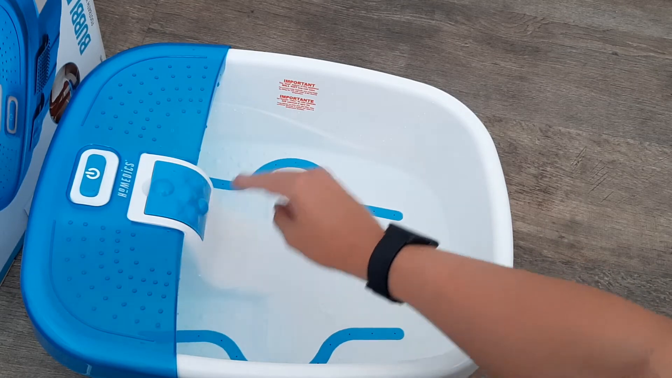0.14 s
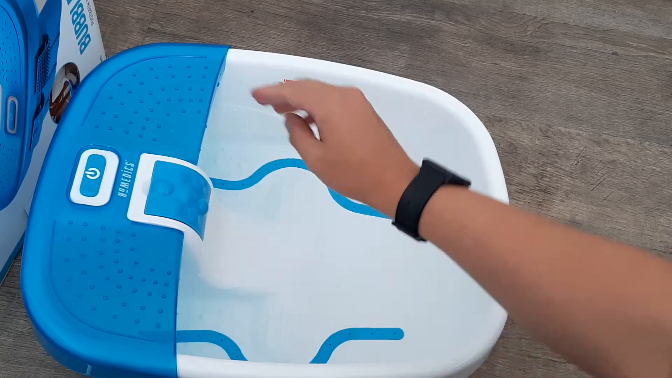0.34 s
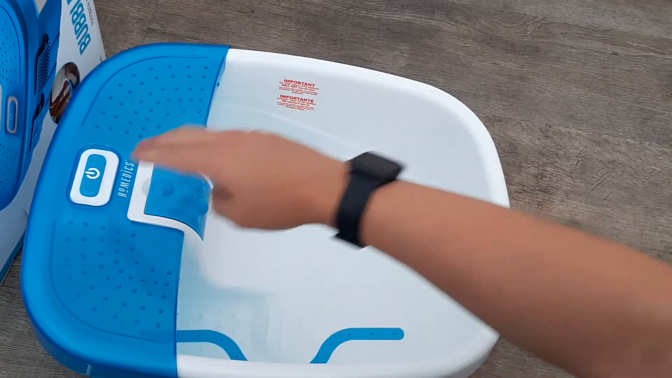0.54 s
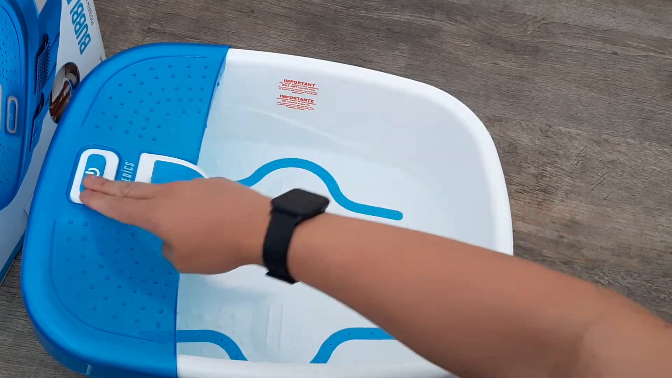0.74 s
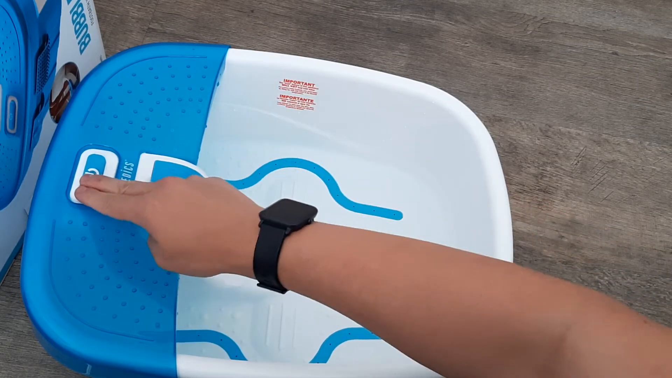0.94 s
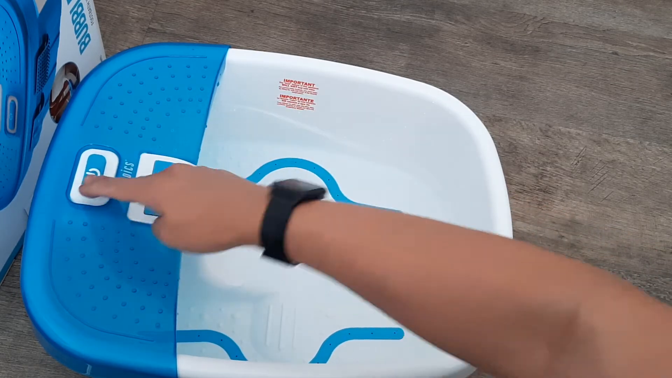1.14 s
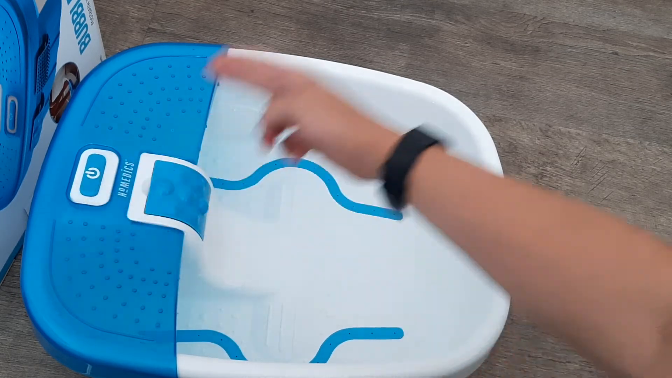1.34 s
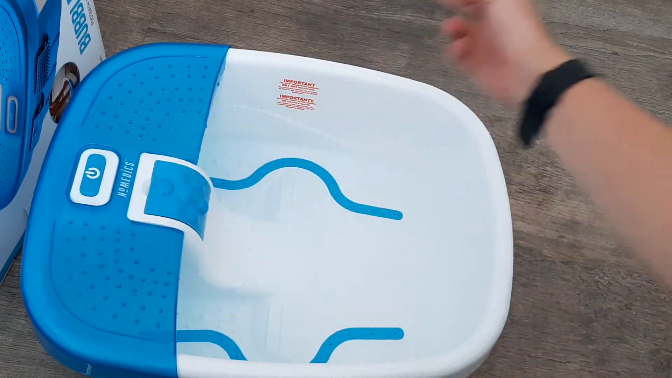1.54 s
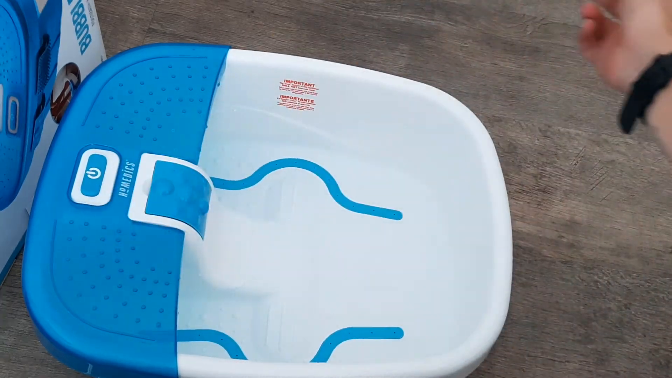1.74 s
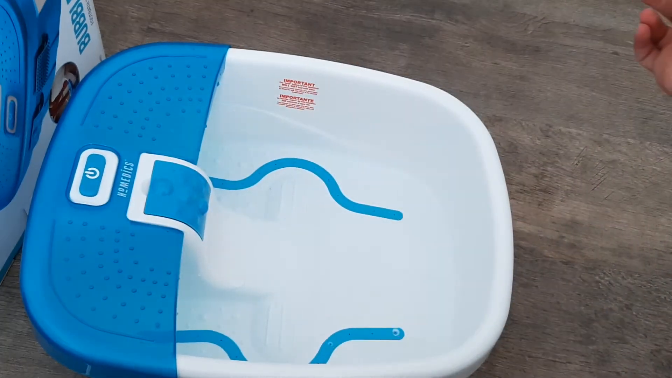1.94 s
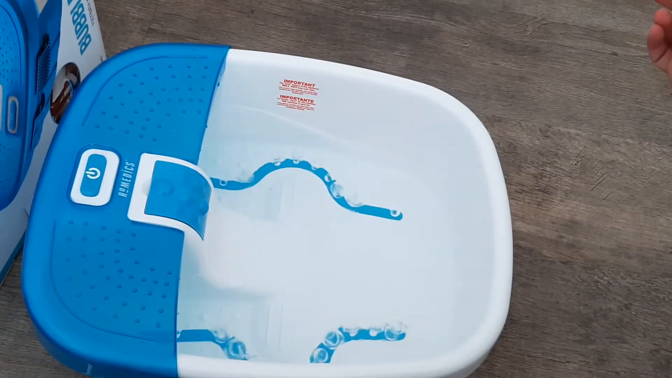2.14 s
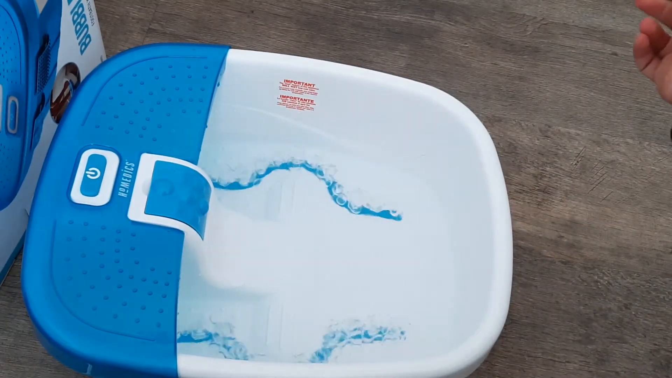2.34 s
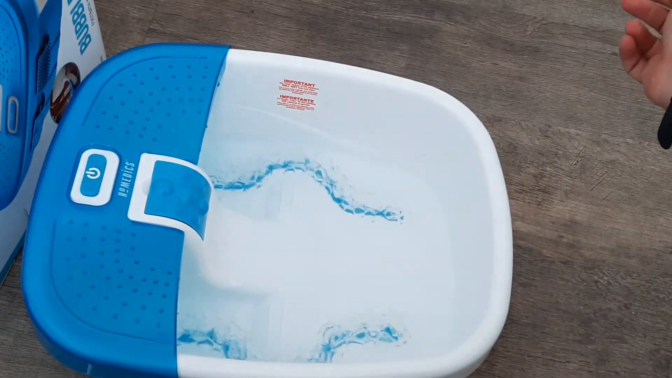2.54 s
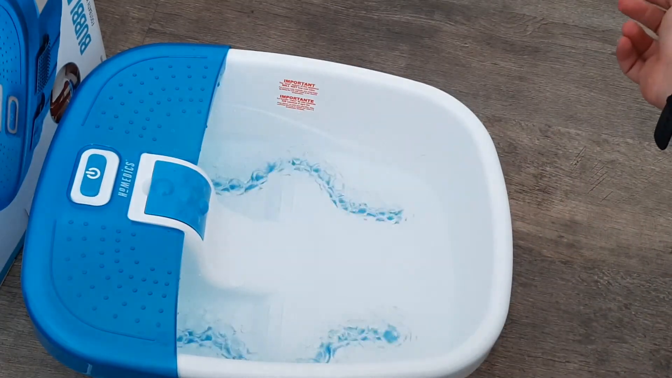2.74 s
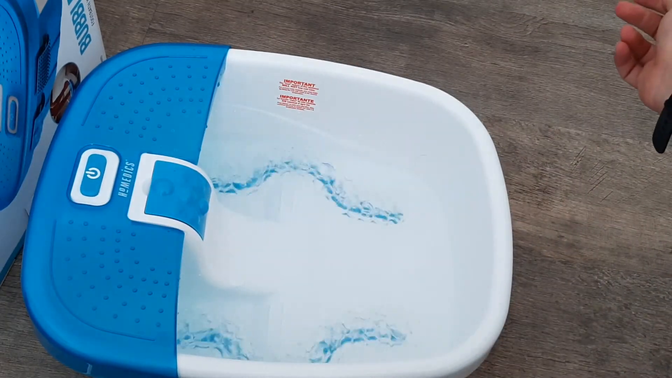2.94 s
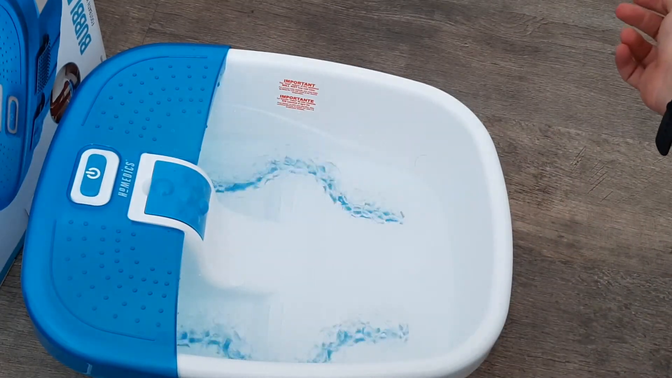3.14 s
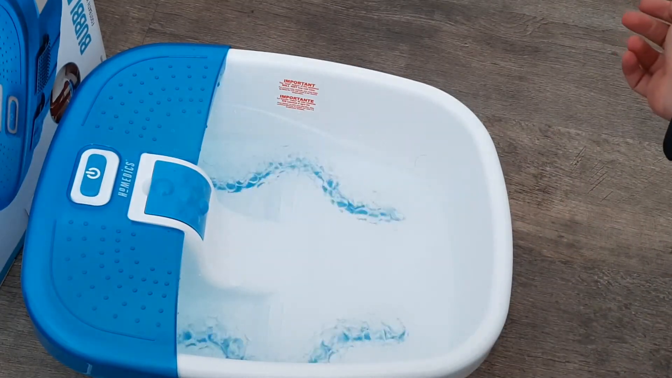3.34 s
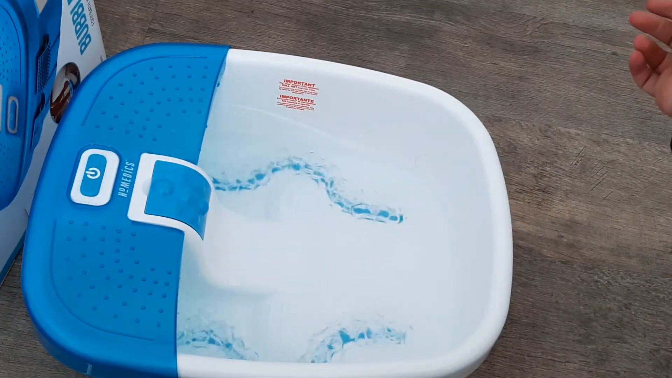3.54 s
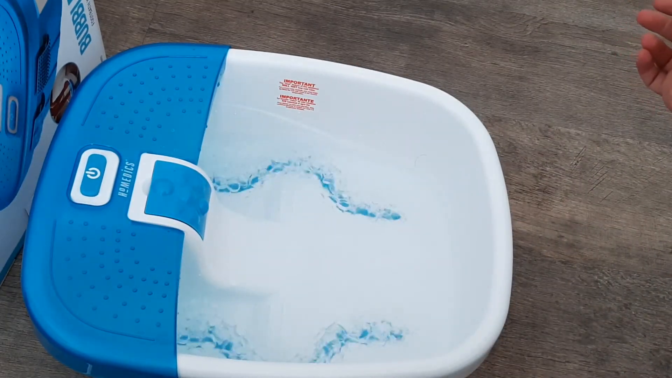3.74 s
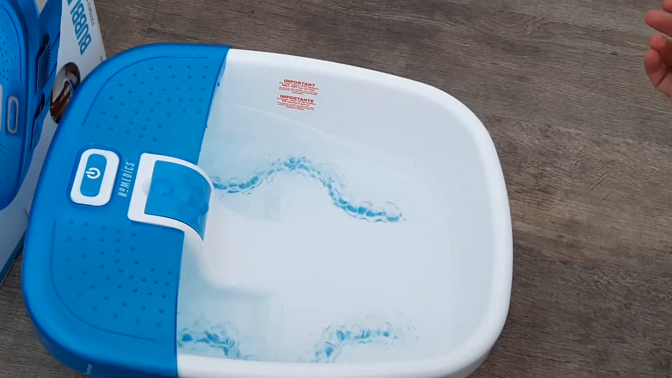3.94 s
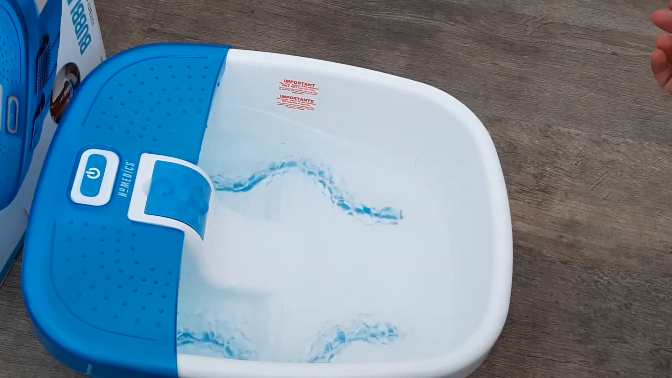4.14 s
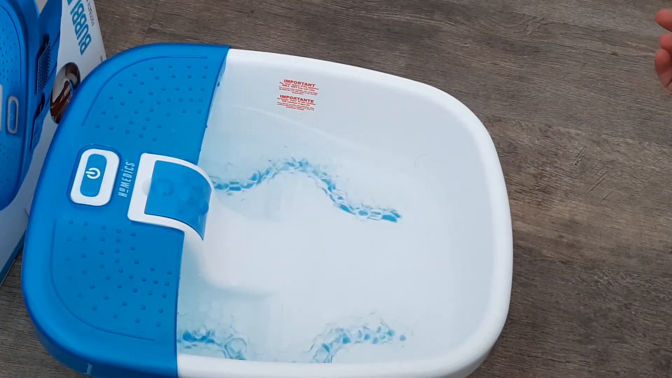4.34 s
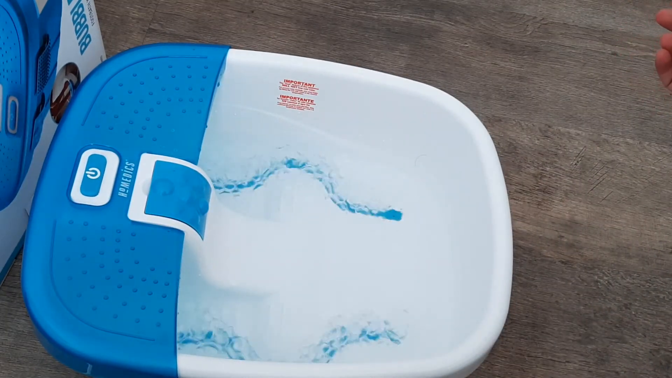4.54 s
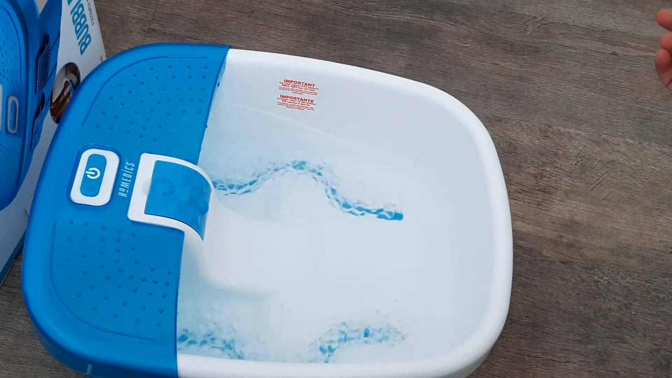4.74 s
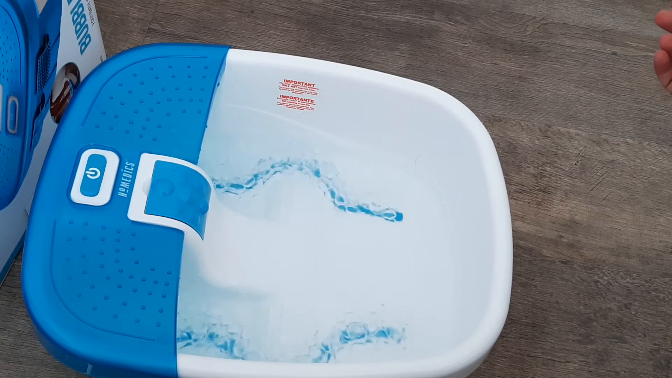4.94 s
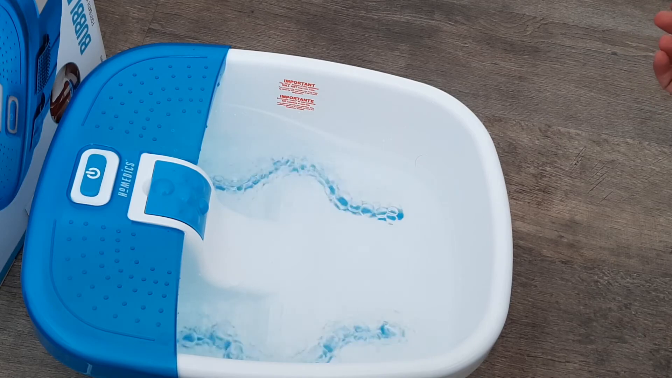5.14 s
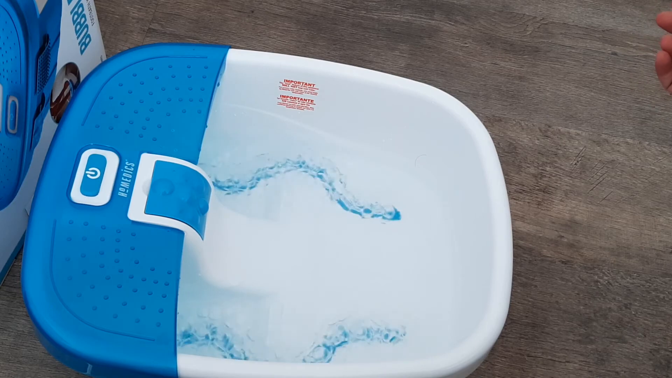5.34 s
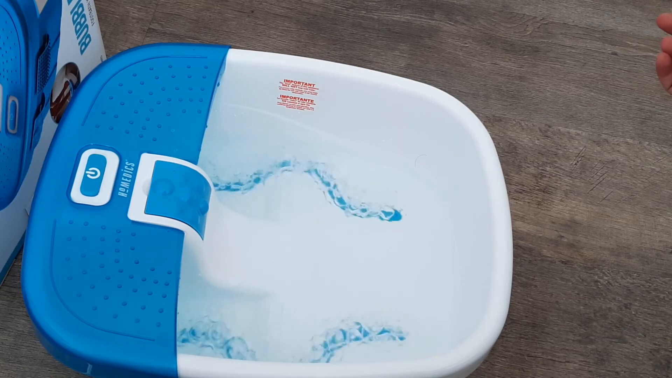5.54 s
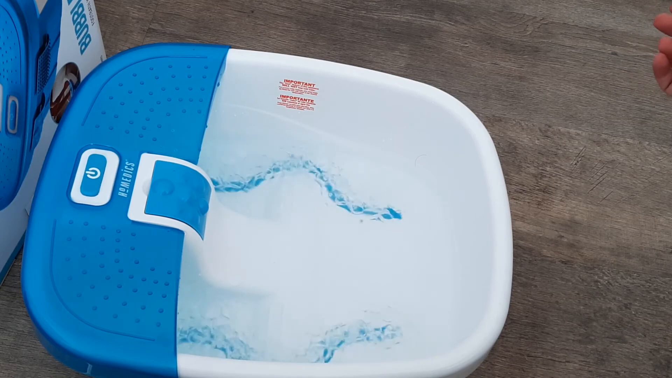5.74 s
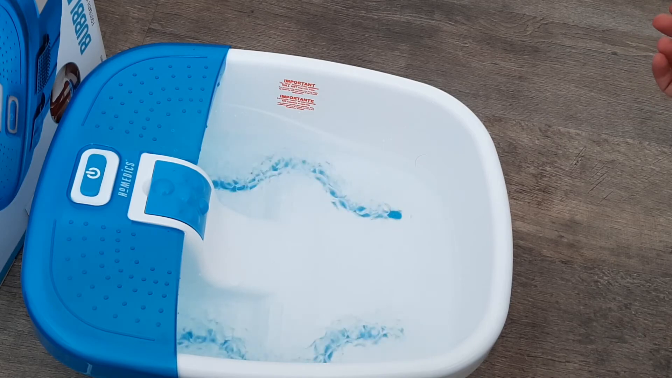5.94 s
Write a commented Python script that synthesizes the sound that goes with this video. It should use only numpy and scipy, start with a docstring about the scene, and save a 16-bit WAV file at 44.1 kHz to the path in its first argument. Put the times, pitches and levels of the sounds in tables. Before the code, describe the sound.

Quiet room tone, then a faint tap and several dry plastic switch clicks around one second. A small blower motor starts at once, growling low and sweeping quickly up to a humming whine. Air rushes louder and bubbles begin to gurgle about two seconds in, thumping hollowly in a plastic tub with bright little spits on top. It continues steadily to the end. Close stereo microphones, small hard-floored room, tub slightly to the right.

```python
"""A finger taps and presses a switch: dry clicks of a control panel, mostly heard through a small room.
A foot spa on the hard floor then spins up its blower motor: hum, growl and whine follow one shaft speed,
with a rush of filtered noise for the blown air, a thin treble hiss and floor rumble.
Air bubbles through the water as short rising rings that thump the plastic tub; bright spits burst on top.
Table levels are settings ahead of the layer trims, the left-right tilt and the overall tone colour."""
import sys
import numpy as np
from scipy import signal
from scipy.fft import rfft, irfft, next_fast_len
from scipy.io import wavfile
from scipy.ndimage import uniform_filter1d, map_coordinates

SR = 44100
rng = np.random.default_rng(int(sys.argv[2]) if len(sys.argv) > 2 else 0)


def waveform_to_disk(signal):
    """Save audio, clipped to [-1, 1], as 16-bit WAV at the path in sys.argv[1]."""
    frames = np.transpose(np.atleast_2d(signal))
    scaled = np.clip(frames, -1, 1) * 32767
    samples = np.round(scaled).astype(np.int16)
    wavfile.write(sys.argv[1], SR, samples)


N = 268569


def amp(db):
    """dB to gain."""
    return 10 ** (np.asarray(db) / 20)


def unit(x):
    """Scaled to rms 1."""
    return x / np.sqrt(np.mean(x ** 2) + 1e-20)


def along(points, hz):
    """Value at hz from (f/Hz, value) points on a log frequency axis."""
    f, v = np.transpose(points)
    return np.interp(np.log(hz + 1), np.log(f + 1), v)


def curves(rows):
    """One value per sample for each column after the time."""
    s, *cols = np.transpose(rows)
    return [np.interp(np.arange(N) / SR, s, c) for c in cols]


def fade_in(s, length):
    """Gain that rises from 0 and reaches 1 at time s, length in seconds."""
    return np.clip(1 + (np.arange(N) / SR - s) / length, 0, 1) ** 2


def wobble(rate):
    """A smooth random curve, rate knots a second."""
    knots = rng.standard_normal(int(N * rate / SR) + 4)
    return map_coordinates(knots, [np.arange(N) * rate / SR])


def noise_pair():
    """Two unrelated white noises."""
    return rng.standard_normal((2, N))


def filtered(x, response):
    """x passed through a response given as a function of frequency."""
    m = next_fast_len(N + SR // 2)
    return irfft(rfft(x, m) * response(np.fft.rfftfreq(m, 1 / SR)), m)[..., :N]


def resonances(modes):
    """Bank of ringing modes (f/Hz, width/Hz, level/dB), each a causal band-pass."""
    def response(f):
        total = 0
        for k, (centre, width, db) in enumerate(modes):
            mode = 1j * f * width / (centre * centre - f * f + 1j * f * width)
            total = total + (-1) ** k * amp(db) * mode  # neighbours alternate in sign
        return total
    return response


# stereo image of diffuse sound: (f/Hz, left-right likeness, 1 = identical, negative = opposed)
LIKENESS = [(60, 0.82), (180, 1), (550, 0.68), (1650, -0.38), (4970, -0.06), (15000, -0.15)]


def mid_side_gains(hz):
    """Share of the common and the opposed signal that gives the likeness at each frequency."""
    turn = np.arccos(np.clip(along(LIKENESS, hz), -1, 1)) / 2
    return np.array([np.cos(turn), np.sin(turn)])


def pair(a, b, spectrum):
    """Two unrelated signals coloured by (f/Hz, level/dB) points and mixed to a stereo rms of 1."""
    mid, side = filtered(np.array([a, b]), lambda hz: amp(along(spectrum, hz)) * mid_side_gains(hz))
    return unit(np.array([mid + side, mid - side]))


def arrive(x):
    """Direct sound reaches the right microphone 8 samples before the left."""
    return np.array([np.pad(x, (8, 0))[:N], x])


# decay of the small room: (f/Hz, t60/s)
ROOM_DECAY = [(150, 0.51), (500, 0.24), (1000, 0.25), (4000, 0.31), (12000, 0.27)]
TAIL_S = .3  # the echo crossfades to a new random tail at this interval


def room_tails(count, long):
    """Random stereo tails that build up in a few ms, then die at each frequency's own speed."""
    hz, t, z = signal.stft(rng.standard_normal((count, 2, long)), SR, nperseg=256)
    envelope = (1 - np.exp(-t / 0.0048)) * amp(-60 * t / along(ROOM_DECAY, hz)[:, None])
    tail = signal.istft(z * envelope, SR, nperseg=256)[1][..., :long]
    gains = mid_side_gains(np.fft.rfftfreq(long, 1 / SR))
    mid, side = np.moveaxis(irfft(rfft(tail) * gains, long), 1, 0)
    tail = np.stack([mid + side, mid - side], 1)
    return tail / np.sqrt(np.mean(np.sum(tail ** 2, -1)))


def room(x):
    """Diffuse echo: each stretch gets its own random tail, crossfaded, so no single tail colours all."""
    hop, long = round(TAIL_S * SR), SR // 2
    count = N // hop + 2
    tail = room_tails(count, long)
    padded = np.pad(x, (hop, 2 * hop))
    out = np.zeros((2, N + 4 * hop + long))
    window = signal.get_window("hann", 2 * hop)
    for k in range(count):
        stretch = padded[k * hop:(k + 2) * hop] * window[:len(padded) - k * hop]
        wet = signal.fftconvolve(stretch[None], tail[k], axes=1)
        out[:, k * hop:][:, :wet.shape[1]] += wet
    return out[:, hop:hop + N]


STEP = 100  # samples between the points of a tone's level curve


def tone(turn, db, spread, flutter_db, rate):
    """A sine of phase turn (db per STEP); each microphone hears its own phase and flutter."""
    knots = rng.standard_normal((2, int(rate * N / SR)))
    step, at = np.arange(0, N, STEP), np.linspace(0, N, knots.shape[1])
    flutter = np.array([np.interp(step, at, k) for k in knots])
    gain = amp(db + flutter_db * flutter)
    gain = np.array([np.interp(np.arange(N), step, g) for g in gain])
    phase = turn % (2 * np.pi) + rng.uniform(-spread, spread, (2, 1))
    return np.sqrt(2) * gain * np.sin(phase.astype(np.float32))


# spectrum of room tone and preamp hiss: (f/Hz, level/dB per Hz)
QUIET_SPECTRUM = [(25, -40), (45, -20), (65, -2), (95, -13), (125, -1), (170, -12), (240, -7), (320, -18.5),
                  (800, -25), (1150, -26), (1450, -22), (1800, -30), (2500, -31), (7000, -43.5),
                  (11000, -45.5), (13000, -34), (15500, -32)]


def room_tone():
    """Steady room tone and preamp hiss: coloured noise that sways a little, stronger on the right."""
    sway_db = 1.5 * wobble(5)
    return amp(-68 + sway_db + [[-1.2], [1.2]]) * pair(*noise_pair(), QUIET_SPECTRUM)


# floor rumble under the tub: (t/s, level/dB)
RUMBLE_LEVEL = [(1.2, -73), (2.0, -58.5), (2.8, -62.5), (6.09, -58)]


def rumble():
    """The floor shakes in the lowest octaves while the motor runs: low-passed noise."""
    level_db, = curves(RUMBLE_LEVEL)
    low = pair(*noise_pair(), [(20, -32), (35, -4), (60, 1), (100, -4), (130, -15), (200, -60)])
    return fade_in(1.4, .2) * amp(level_db + 4.5) * low


# thin treble hiss that swells during the run-up: (t/s, level/dB)
TREBLE_LEVEL = [(1.4, -88), (1.6, -77), (1.75, -66), (2.0, -61), (2.4, -63), (3.0, -72), (6.09, -76)]


def hiss():
    """A thin treble hiss swells during the run-up, is strongest near 2 s, then sinks: band-passed noise."""
    level_db, = curves(TREBLE_LEVEL)
    treble = pair(*noise_pair(), [(3000, -43), (5500, -9), (7500, 12), (10000, -6), (15000, -12)])
    return fade_in(1.4, .1) * amp(level_db) * treble


WHISTLE_S, WHISTLE_LASTS_S, WHISTLE_HZ, WHISTLE_DB = 5.06, .1, 3183, -55  # LASTS: to 1/e either side


def whistle():
    """A thin tone of steady pitch swells once beside the motor's whine."""
    t = np.arange(N) / SR
    swell = np.exp(-((t - WHISTLE_S) / WHISTLE_LASTS_S) ** 2)
    return swell * tone(2 * np.pi * WHISTLE_HZ * t, WHISTLE_DB, spread=1, flutter_db=2, rate=25)


# switch contacts: (t/s, peak level/dB, then colour level/dB at f/Hz 280, 450, 700, 1600, 4000, 6000, 11000)
CONTACTS = [(0.78, -42, 10, -5, -2, -6, -18, -17.5, -35), (0.9899, -27, -14, -5, 7, 3.5, -3, -12, -4.5),
            (1.0209, -32.5, -12, -5, -8, 5, -4, -7, -0.5), (1.1805, -24, 2, 9, 14.5, 4, 4, 4, -12.5)]
# modes of the control panel: (f/Hz, width/Hz, level/dB)
PANEL_MODES = [(352, 79, 9), (497, 95, 6.5), (610, 130, 3), (930, 160, -8.5), (1504, 150, 8),
               (1780, 113, 8.5), (2040, 350, 5), (3080, 670, 2), (3586, 130, 9), (3830, 130, 8),
               (4320, 160, 6), (4820, 210, 1), (5340, 500, -3.5), (6110, 200, 1), (7240, 1360, 1.5),
               (10300, 5400, -2)]


def switch():
    """Each contact is an impulse ringing the control panel; mostly the room's answer is heard."""
    blows = np.zeros(N)
    for s, db, *colour in CONTACTS:
        blow = np.zeros(N)
        blow[round(s * SR)] = 1
        tint = list(zip((280, 450, 700, 1600, 4000, 6000, 11000), colour))
        blow = filtered(blow, lambda hz: amp(along(tint, hz)) * resonances(PANEL_MODES)(hz))
        blows += blow * amp(db) / np.abs(blow).max()
    return amp(0.5) * arrive(blows) + amp(8.5) * room(blows)


# clearest surface spits: (t/s, level/dB)
CLEAR_SPITS = [(2.5084, -38), (2.7578, -44), (2.8735, -42), (3.0666, -50), (3.1509, -47), (3.3095, -49),
               (3.552, -42), (4.0778, -45), (4.1272, -45), (4.1786, -59), (4.445, -43), (4.7503, -55),
               (4.9284, -50), (5.0526, -52), (5.7206, -50), (5.8857, -52), (5.945, -48)]


def fizz():
    """Small bubbles burst at the surface: decaying bright noise, a few strong spits among many faint."""
    draw = rng.random((2, N))
    spits = (draw[0] < 120 / SR) * amp(-68 + 4 * draw[1])  # about 120 faint ones a second
    s, db = np.transpose(CLEAR_SPITS)
    spits[(s * SR).astype(int)] = amp(db - 9)
    shape = amp(-60 * np.arange(4000) / SR / .06)  # falls 60 dB in 60 ms
    bright = pair(*noise_pair(), [(2500, -30), (5000, -15), (10000, 4), (12500, -3.5), (15000, -9.5)])
    return fade_in(2.3, .5) * signal.fftconvolve(spits, shape)[:N] * bright


def bubbles(start, db, hz, cycles, rise):
    """Each bubble rings, decaying to 1/e over the given cycles, while its pitch climbs."""
    t = np.arange(1100) / SR
    life = (cycles / hz)[:, None]
    envelope = (1 - np.exp(-t / 0.0002)) * np.exp(-t / life)
    ring = envelope * np.sin(2 * np.pi * hz[:, None] * t * (1 + rise * t / life))
    at = (start * SR).astype(int)[:, None] + np.arange(len(t))
    return np.bincount(at.ravel(), (amp(db)[:, None] * ring).ravel(), N + SR)[:N]


# stream of bubbles: (t/s, level/dB)
STREAM_LEVEL = [(1.98, -49), (2.05, -50), (2.25, -36), (2.45, -36), (3.1, -33), (6.09, -34)]
# resonances of the tub with water: (f/Hz, width/Hz, level/dB)
TUB_MODES = [(166, 22.4, -13), (354.4, 45.6, -12), (441.3, 32.4, -11.5), (495, 80, -14.5), (604, 39, -2.5),
             (702, 99, -6), (821, 150, -7), (934, 104, -5), (1186, 80, -7.5), (1470, 80, -6.5),
             (2000, 230, -29)]
# largest bubbles: (t/s, level/dB, f/Hz)
LARGE_BUBBLES = [(2.015, -32, 660), (2.065, -28.5, 670), (2.125, -24, 604), (2.16, -29, 600),
                 (2.258, -30, 615), (2.349, -19, 610), (2.437, -21, 708), (2.536, -20.5, 598),
                 (2.578, -21.5, 620), (2.727, -26, 645), (2.845, -32, 620), (2.906, -22.5, 578),
                 (3.028, -35, 640), (3.289, -24, 680), (3.45, -22, 610), (3.597, -23, 640),
                 (3.736, -18.5, 604), (3.944, -19, 604), (4.043, -36, 598), (4.135, -30.5, 646),
                 (4.269, -23, 670), (4.385, -23, 645), (4.539, -35, 644), (4.616, -20, 630),
                 (4.782, -36, 613), (4.934, -22, 636), (5.038, -20, 609), (5.166, -22, 640),
                 (5.314, -19.5, 670), (5.484, -33, 604), (5.532, -18.5, 616), (5.607, -30.5, 540),
                 (5.651, -26, 635), (5.756, -39, 566), (5.814, -25, 620)]
# drips falling into the water: (t/s, level/dB, f/Hz)
DRIPS = [(2.794, -31, 2030), (4.1604, -31, 2070), (4.5012, -34, 2040), (5.4076, -54, 1930)]


def water():
    """Bubbles of many sizes leave the air strips through the tub's resonances; gulps and drips ring bare."""
    level_db, = curves(STREAM_LEVEL)
    draw = rng.standard_normal((4500, 3))
    start = rng.uniform(1.9, N / SR, len(draw))
    pitch = 600 * np.exp(0.657 * draw[:, 1])
    cycles = 1.287 * np.exp(0.34 * draw[:, 2])
    stream = bubbles(start, 2.4 * draw[:, 0], pitch, cycles, rise=0.1096)
    thumps = unit(filtered(stream, resonances(TUB_MODES)))
    ring = thumps * amp(level_db + wobble(20)) * fade_in(2, .04)
    s, db, hz = np.transpose(LARGE_BUBBLES)
    gulps = bubbles(s, db + 4.5, hz, cycles=2.6, rise=0.014)
    gulps += bubbles(s, db - 11, 1.5 * hz, cycles=1.2, rise=0.051)
    s, db, hz = np.transpose(DRIPS)
    ring += bubbles(s, db, hz, cycles=20, rise=0.0029)
    direct = arrive(amp(-1.0) * ring + amp(-5.0) * gulps)
    return direct + room(amp(-3.0) * ring + amp(-1.0) * gulps)


# run-up of the shaft: (t/s, turns a second f/Hz); it closes in on FULL_HZ ever more slowly
SHAFT_SPEED = [(1.25, 50.1), (1.4, 73.6), (1.47, 86.1), (1.62, 122.8), (1.77, 152.9), (2.0, 192.1),
               (2.3, 228.25), (2.6, 249.45), (2.95, 263.25), (3.4, 272.73), (3.85, 278.77), (4.23, 281.45),
               (4.79, 283.35), (5.34, 284.58), (5.71, 285.01), (6.09, 285.15)]
FULL_HZ = 286


def shaft():
    """Turns a second; what is lacking to full speed shrinks smoothly."""
    lack, = curves([(s, np.log(FULL_HZ - hz)) for s, hz in SHAFT_SPEED])
    return FULL_HZ - np.exp(uniform_filter1d(lack, size=3000))


# unbalance hum as tub and floor pass it on: (shaft turns f/Hz, level/dB, left-right level/dB)
HUM_LEVEL = [(50, -86, 6), (91, -83, 6), (119, -52, 2), (135, -64, 4), (144, -53, 1), (156.6, -37.5, -0.3),
             (202.6, -32, 1), (232.4, -23.5, -2.5), (247, -33, -5), (263.7, -25, -0.3), (267.7, -28, -1.5),
             (296, -34, -6)]


def hum(turn, coarse):
    """Unbalance of the shaft: one tone at the shaft rate, its level set by the speed."""
    at, hum_db, pan_db = np.transpose(HUM_LEVEL)
    sides_db = [np.interp(coarse, at, hum_db + half * pan_db) for half in (.5, -.5)]
    return tone(turn, np.array(sides_db) + [[.6], [-.6]], spread=0.024, flutter_db=0.72, rate=17)


# low multiples: (multiple of the shaft rate, level/dB)
LOW_MULTIPLES = [(3, -48.5), (4, -59.5), (5, -61.5)]
# what the shell does to them: (f/Hz, level/dB)
SHELL_COLOUR = [(250, -24), (340, -34), (410, -10.5), (450, -23), (495, -1.5), (540, -11), (600, -3),
                (700, -3), (850, -4.5), (1050, -6), (1150, 8.5), (1370, 10), (1450, -18), (1620, 12),
                (1720, 2.5)]
RATTLE_HZ, RATTLE_WIDE_HZ, RATTLE_DB = 138, 30, 9  # shaft rate at which the low multiples get a lift


def low_multiples(turn, coarse):
    """Low multiples of the shaft rate, coloured by the shell and lifted around one shaft speed."""
    rattle_db = RATTLE_DB * np.exp(-((coarse - RATTLE_HZ) / RATTLE_WIDE_HZ) ** 2)
    tones = 0
    for k, db in LOW_MULTIPLES:
        level_db = db + along(SHELL_COLOUR, k * coarse) + rattle_db
        tones = tones + tone(k * turn, level_db, spread=.7, flutter_db=3.5, rate=25)
    return tones


# whine: (multiple of the shaft rate, then level/dB at each of the shaft rates below after the first)
WHINE_MULTIPLES = [(6, -61, -58, -51, -50, -57), (8, -76, -60, -58, -66, -69), (9, -67, -66, -66, -64, -64),
                   (11, -75, -73, -70, -68, -70), (12, -76, -78, -77, -69, -65),
                   (13, -75, -88, -72, -72, -74), (14, -79, -83, -70, -66, -74),
                   (15, -69, -67, -71, -69, -63), (16, -86, -86, -70, -59, -73),
                   (17, -82, -79, -73, -69, -68), (18, -87, -84, -76, -69, -68),
                   (19, -84, -75, -69, -73, -67), (20, -76, -68, -67, -68, -68),
                   (21, -83, -81, -75, -69, -73), (22, -85, -80, -71, -73, -75),
                   (23, -87, -85, -75, -75, -66), (24, -84, -83, -79, -67, -78),
                   (25, -76, -71, -69, -64, -59), (26, -88, -86, -74, -70, -69),
                   (27, -89, -78, -73, -64, -61), (28, -88, -81, -70, -65, -78),
                   (29, -87, -80, -72, -64, -72), (30, -77, -65, -60, -60, -60),
                   (31, -88, -76, -72, -72, -72), (32, -89, -82, -62, -62, -62),
                   (33, -85, -76, -70, -70, -69), (34, -84, -82, -72, -73, -75),
                   (35, -73, -75, -73, -69, -71), (36, -90, -77, -78, -73, -79),
                   (37, -90, -81, -73, -81, -77), (38, -90, -80, -75, -77, -77),
                   (39, -89, -79, -77, -77, -84), (40, -84, -75, -68, -73, -70),
                   (41, -87, -73, -72, -78, -75), (42, -89, -77, -84, -80, -83),
                   (43, -83, -86, -77, -79, -79), (44, -89, -80, -76, -83, -81),
                   (45, -82, -77, -67, -72, -77), (46, -88, -84, -82, -83, -82),
                   (47, -94, -86, -82, -86, -83), (48, -89, -90, -79, -83, -86),
                   (49, -91, -90, -81, -85, -86), (50, -86, -78, -72, -80, -79),
                   (51, -90, -86, -82, -82, -82), (52, -87, -86, -90, -86, -89),
                   (53, -91, -89, -86, -86, -85), (54, -90, -89, -84, -85, -83),
                   (55, -87, -83, -81, -80, -87), (56, -92, -85, -82, -84, -84),
                   (57, -92, -85, -82, -84, -84), (58, -92, -85, -82, -84, -84),
                   (59, -92, -85, -82, -84, -84), (60, -90, -79, -77, -80, -80),
                   (61, -92, -85, -82, -84, -84), (62, -92, -85, -82, -84, -84),
                   (63, -92, -85, -82, -84, -84), (64, -92, -85, -82, -84, -84),
                   (65, -90, -84, -77, -80, -80)]
# shaft rates of those levels, after the one where the whine is silent: (f/Hz)
WHINE_SPEEDS = [60, 150, 215, 258, 276, 284.5]
SWELL_DB, SWELLS_PER_S = 2.5, 2.5  # each multiple comes and goes slowly
STANDING_HZ = 170  # and swells as it glides through the room's standing waves, this far apart


def whine(turn, coarse):
    """High multiples of the shaft rate swell on their own; the walls smear them as they glide."""
    tones = 0
    for k, *levels_db in WHINE_MULTIPLES:
        place = SWELLS_PER_S * np.arange(0, N, STEP) / SR + k * coarse / STANDING_HZ
        knots = rng.standard_normal(int(place.max()) + 2)
        swell_db = SWELL_DB * np.interp(place, np.arange(len(knots)), knots)
        db = np.interp(coarse, WHINE_SPEEDS, [-110, *levels_db]) + swell_db
        tones = tones + tone(k * turn, db, spread=1.2, flutter_db=4, rate=22)
    return amp(-2) * tones + amp(-1) * room(tones[0])


GROWL_DB, GROWL_FADES_DB = -53.5, 22  # at rest; loss by 190 turns a second


def growl(turn, hz):
    """Noise that pulses once a turn and fades as the shaft gains speed."""
    pulsed = noise_pair() * (1 + 0.63 * np.sin(turn))
    spectrum = [(200, -27), (370, 1.5), (560, -0.5), (750, -18), (1500, -15.5), (3000, -58)]
    level_db = GROWL_DB - GROWL_FADES_DB * (hz / 190) ** 2.5
    return amp(level_db) * pair(*pulsed, spectrum)


# blower: (t/s, air rush level/dB, 7th multiple of the shaft rate level/dB, 10th multiple level/dB)
BLOWER_LEVELS = [(1.2, -91, -95, -97), (1.3, -69, -86, -88), (1.6, -56, -69, -70), (1.8, -52, -74, -68),
                 (2.0, -52, -57, -61), (2.2, -49.5, -60, -58), (2.6, -46.5, -42, -56.5),
                 (2.95, -41.5, -41, -51), (3.4, -42, -43.5, -58.5), (3.8, -39.5, -56, -60),
                 (3.95, -40, -52, -52.5), (4.25, -39, -73, -55), (4.6, -39.5, -54, -54),
                 (4.9, -39, -51, -55.5), (5.05, -38, -50, -43), (5.25, -39, -56, -56),
                 (6.09, -40, -52, -68)]
# spectrum of the blown air: (f/Hz, level/dB per Hz)
RUSH_SPECTRUM = [(30, -19), (70, -6), (120, 11.5), (450, 12.5), (1000, 4.5), (1400, 12), (1700, 7),
                 (2000, 6), (2400, -1), (2900, 0.5), (3300, 1), (3900, -3), (4450, 2.5), (5200, -7),
                 (5850, 2), (6200, -6), (6600, 2), (7100, -10), (7600, 0), (11000, -19), (15000, -17)]


def blower(turn):
    """Blown air as coloured noise, with the 7th and 10th multiples of the shaft rate as tones."""
    rush_db, seventh_db, tenth_db = curves(BLOWER_LEVELS)
    seventh = tone(7 * turn, seventh_db[::STEP] - 1.5, spread=1.1, flutter_db=2.5, rate=45)
    tenth = tone(10 * turn, tenth_db[::STEP] - 4.5, spread=1.1, flutter_db=6, rate=45)
    rush = amp(rush_db + 0.7 * wobble(11)) * pair(*noise_pair(), RUSH_SPECTRUM)
    return seventh + tenth + rush


def motor():
    """One shaft drives it all: hum, multiples and whine, a growl while it is slow, and blown air."""
    hz = shaft()
    turn = 2 * np.pi * np.cumsum(hz + .2 * wobble(12)) / SR  # shaft angle, slightly unsteady
    coarse = hz[::STEP]
    tones = hum(turn, coarse) + low_multiples(turn, coarse) + whine(turn, coarse)
    return fade_in(1.33, 0.091) * (tones + growl(turn, hz) + blower(turn))


def scene():
    """All layers together; the tub stands a little to the right."""
    layers = rumble() + hiss() + whistle() + switch() + fizz() + water() + motor()
    return layers * amp([[-.9], [.9]])


# overall tone colour, with a dip near 9 kHz: (f/Hz, level/dB)
TONE_COLOUR = [(25, -25), (60, -4.5), (150, -0.5), (7600, 0), (8200, -14.5), (8700, -29), (9400, -9.5),
               (10500, -4), (12000, 2.5), (15600, 1.5)]
TOP_HZ = 15620  # nothing passes above


def record(dry):
    """An overall tone curve shapes the scene, room tone and hiss join in, and the band is limited."""
    coloured = filtered(dry, lambda hz: amp(along(TONE_COLOUR, hz)))
    return filtered(coloured + room_tone(), lambda hz: hz < TOP_HZ)


dry = scene()
out = record(dry)
waveform_to_disk(out)
```